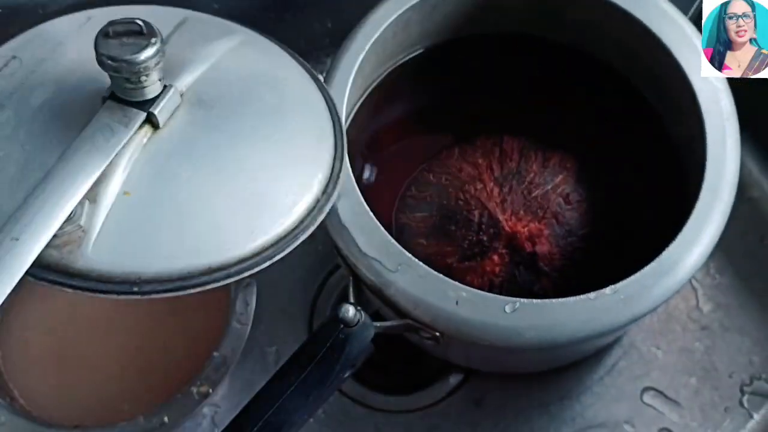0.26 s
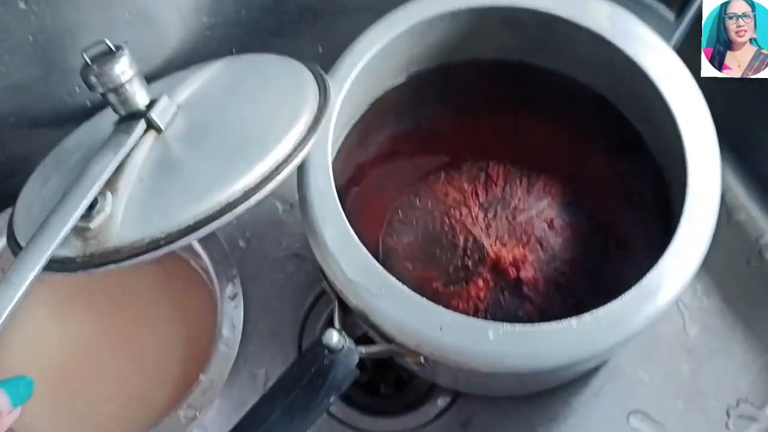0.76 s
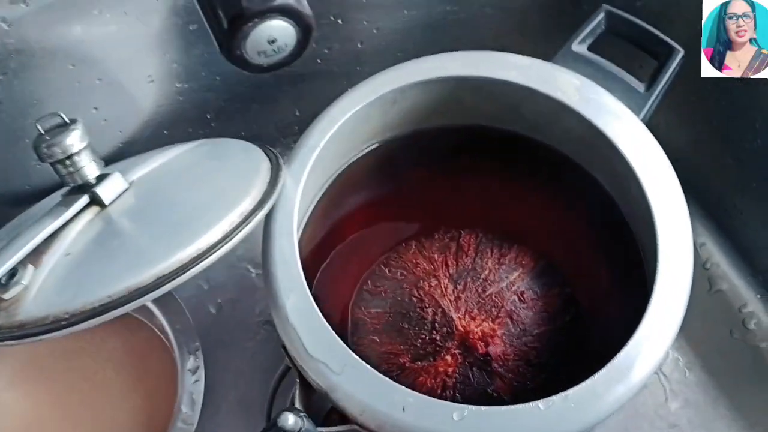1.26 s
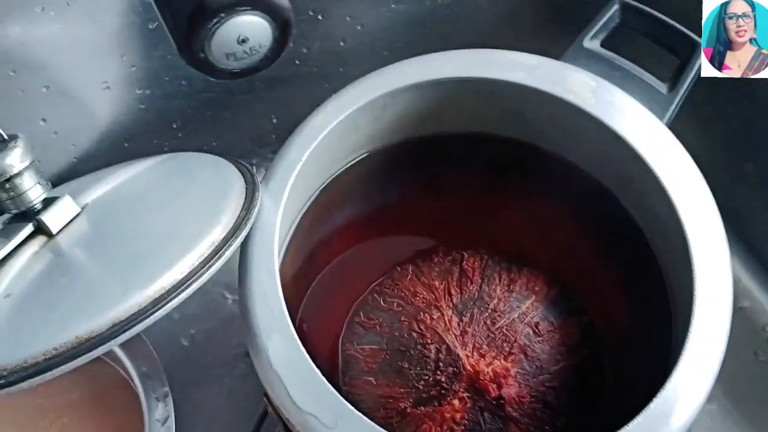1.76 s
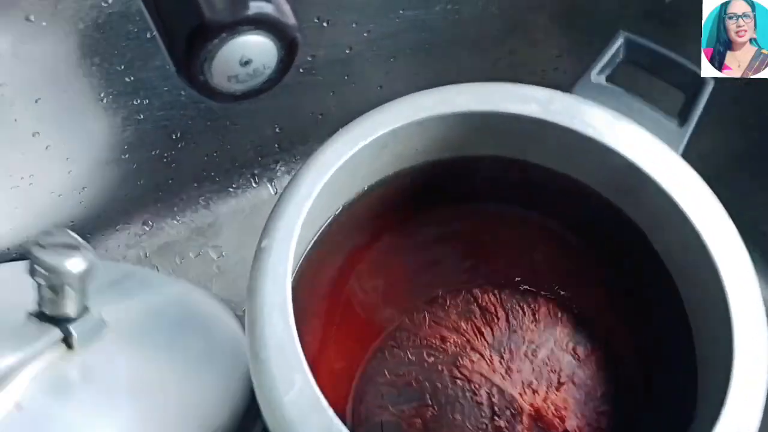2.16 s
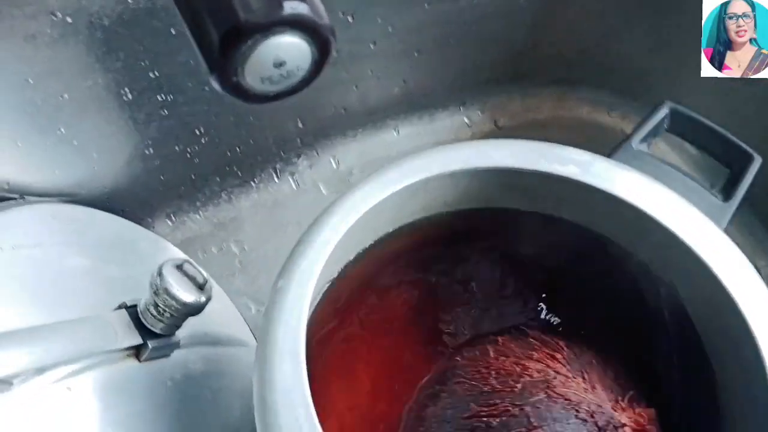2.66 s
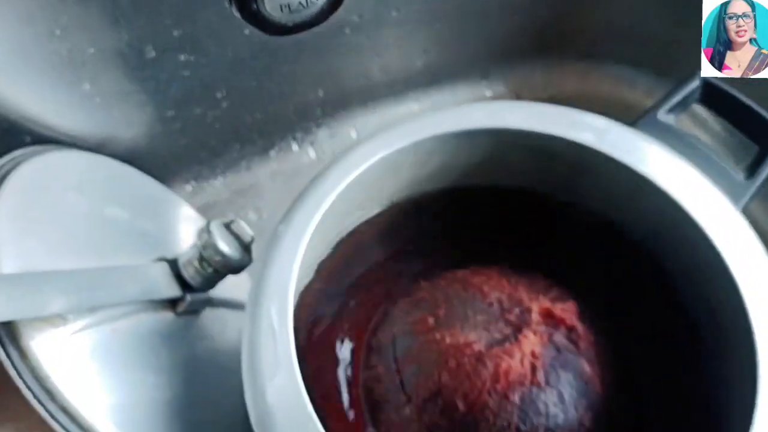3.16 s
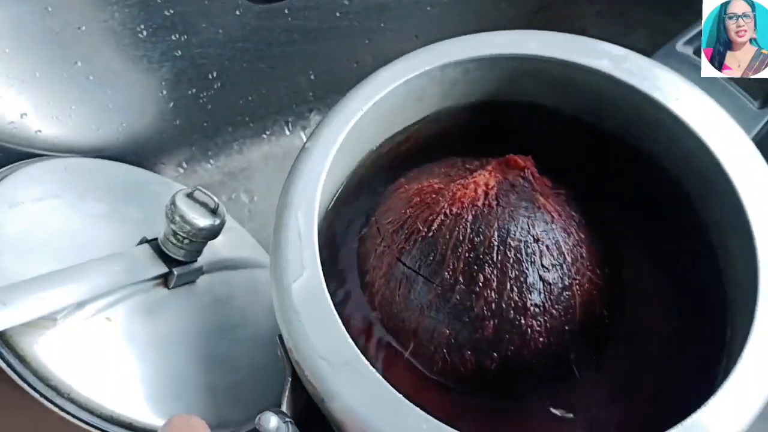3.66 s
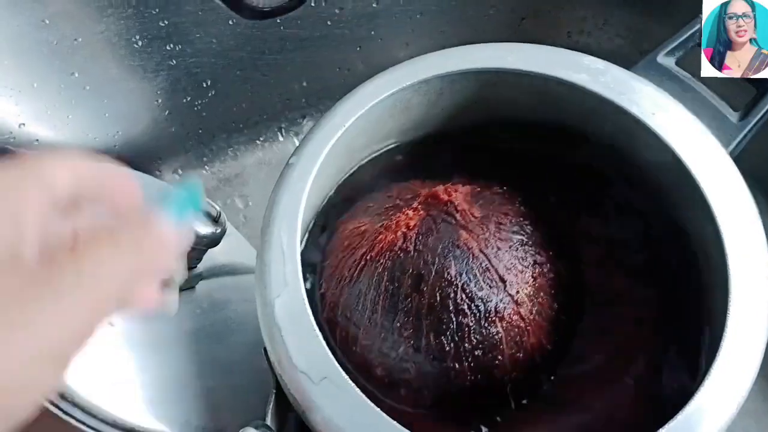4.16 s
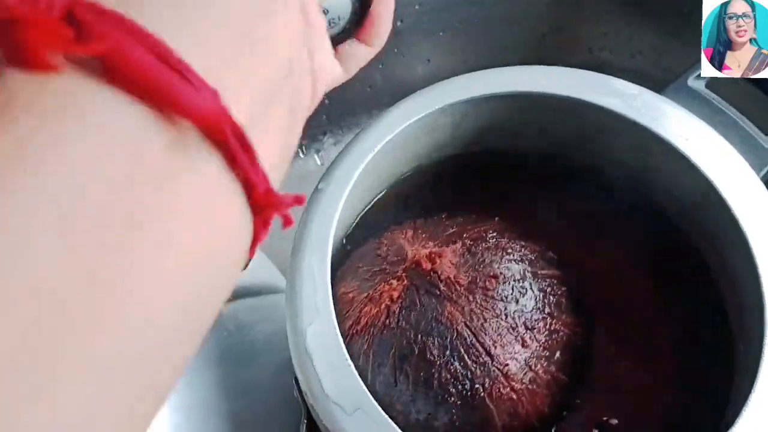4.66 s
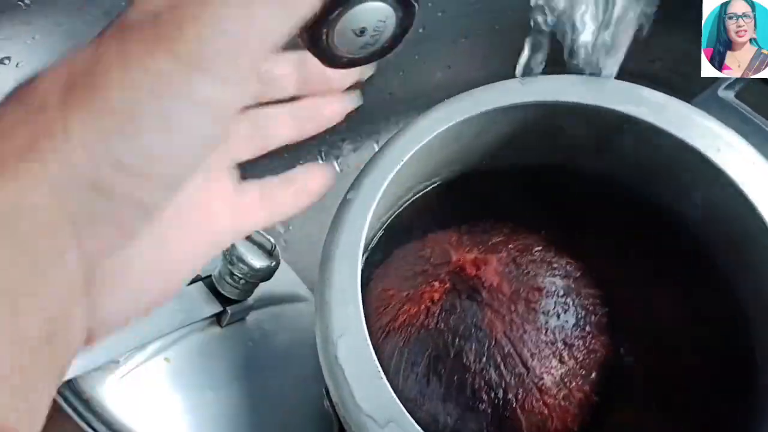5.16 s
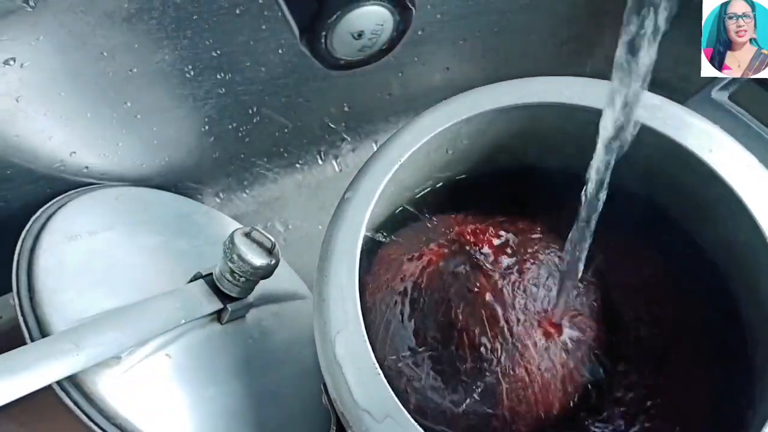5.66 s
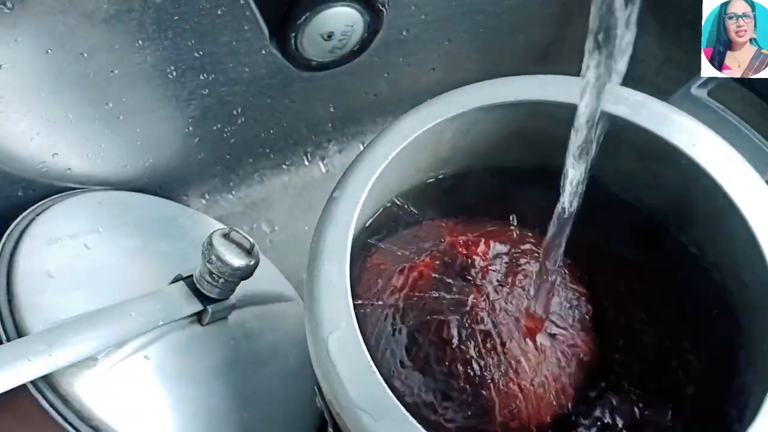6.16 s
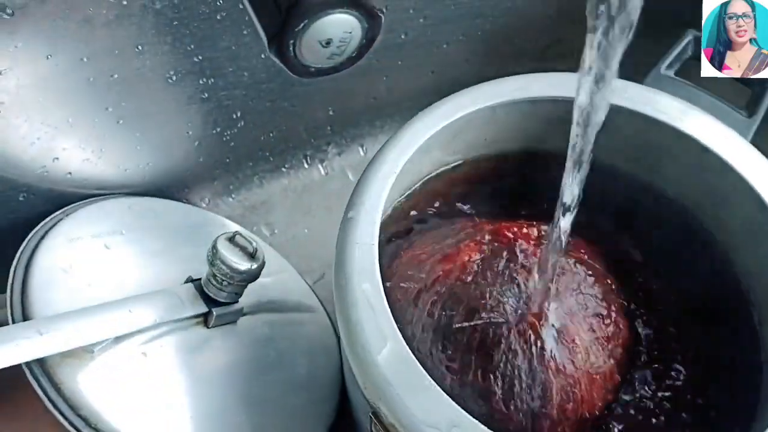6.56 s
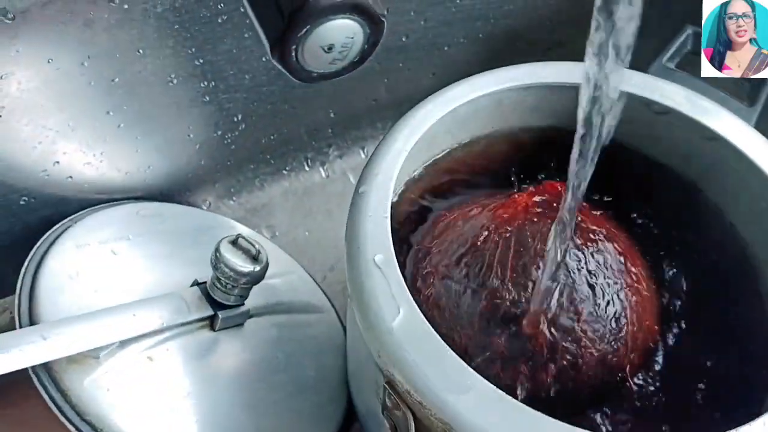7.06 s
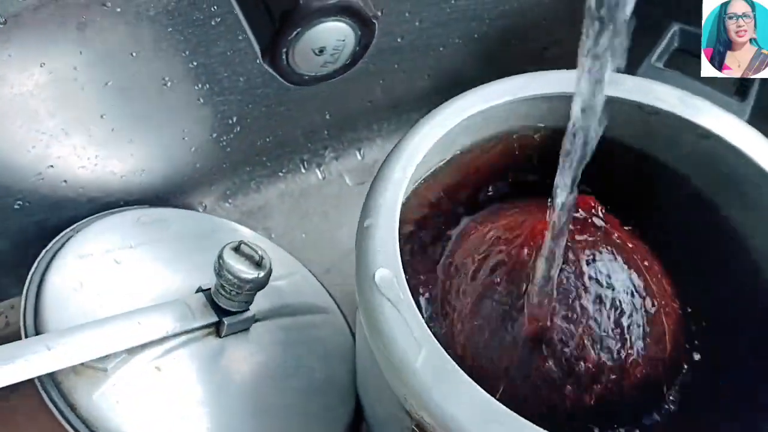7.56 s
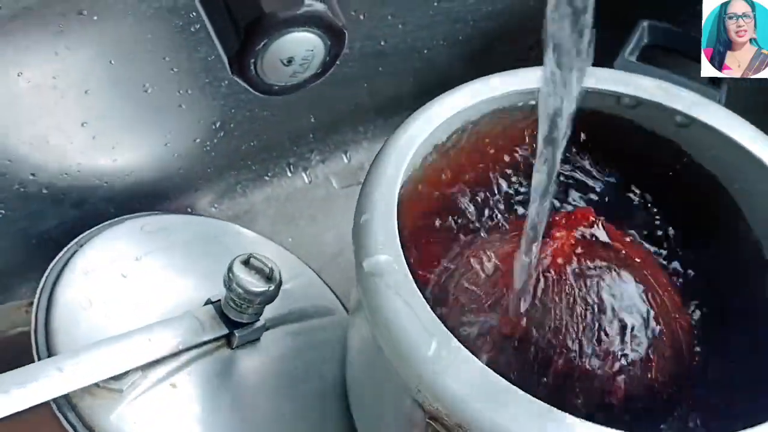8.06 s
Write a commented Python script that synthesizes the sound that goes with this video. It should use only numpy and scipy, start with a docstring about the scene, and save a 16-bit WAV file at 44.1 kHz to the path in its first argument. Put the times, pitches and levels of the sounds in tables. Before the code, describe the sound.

Metal lid and pot clank, scrape and thud in a steel sink, then a tap knob clicks and water splashes over a coconut.

```python
"""A lid and a pot knock and scrape as they are shifted and set down in a steel kitchen sink, over a faint rumble;
a tap knob clicks and grates, then water runs over a coconut into the pot, which rocks and bumps.
Impacts are noise crashes with decaying modes, scrapes are dense stick-slip grains, and water is
filtered droplet noise with damped bubbles. Two close microphone ports hear it with hiss suppression."""
import sys
import numpy as np
from scipy import signal
from scipy.fft import rfft, irfft, next_fast_len
from scipy.io import wavfile
from scipy.ndimage import uniform_filter1d

SR = 44100
rng = np.random.default_rng(int(sys.argv[2]) if len(sys.argv) > 2 else 0)


def wav_record(signal):
    """Record a signal, one row per channel, as 16-bit PCM in the file named by sys.argv[1]."""
    frames = np.transpose(np.atleast_2d(signal))
    bounded = np.clip(frames, -1, 1)
    # unit amplitude maps onto the largest positive 16-bit level
    quanta = np.round(bounded * 32767).astype(np.int16)
    wavfile.write(sys.argv[1], SR, quanta)


N = 366912


def amp(db):
    """Decibel law: the amplitude ratio of a level in dB."""
    return 10 ** (np.asarray(db) / 20)


def rms_one(x):
    """Normalisation by mean power: scaled to rms 1."""
    return x / np.sqrt(np.mean(x ** 2) + 1e-20)


def in_time(table):
    """Linear interpolation: a table's columns at every sample, -140 dB outside it."""
    s, *columns = np.transpose(table)
    t = np.arange(N) / SR
    return [np.interp(t, s, column, left=-140, right=-140) for column in columns]


def gate(start, end, fade):
    """Envelope: fades in, holds at 1, fades out."""
    t = np.arange(N) / SR
    return np.clip(np.minimum(t - start, end - t) / fade, 0, 1) ** 2


def convolve(x, h):
    """Convolution theorem: spectra multiply; the result is cut to N."""
    size = next_fast_len(N + len(h))
    return irfft(rfft(x, size) * rfft(h, size), size)[..., :N]


def band_pass(x, low_hz, high_hz):
    """Butterworth band-pass: flat between its two edges."""
    return signal.sosfilt(signal.butter(2, [low_hz, high_hz], "band", fs=SR, output="sos"), x)


def ring(clicks, hz, t60):
    """Damped resonator: a unit click sets a sine of height 1 ringing."""
    r, w = amp(-60 / (t60 * SR)), 2 * np.pi * hz / SR
    return signal.lfilter([0, np.sin(w)], [1, -2 * r * np.cos(w), r * r], clicks + 1e-18)


def drift(rate_hz):
    """Low-passed Gaussian noise: slow chance of spread 1, computed at every 40th sample."""
    r = np.exp(-80 * np.pi * rate_hz / SR)
    noise = rng.standard_normal(N // 40 + 2002)
    slow = signal.lfilter([1], [1, -2 * r, r * r], noise)[2000:]   # the filter's start is dropped
    return np.interp(np.arange(N) / 40, np.arange(len(slow)), rms_one(slow))


def grains(per_s, spread_db):
    """Shot noise: two draws of uneven clicks at random moments; rms 1."""
    sizes = amp(spread_db * np.minimum(rng.exponential(1, (2, N)), 5))
    sizes = sizes * rng.choice([-1, 1], (2, N))
    return rms_one(sizes * (rng.random((2, N)) < per_s / SR))


# left-right likeness of the sound at the two ports: pitch_hz, likeness (0 to 1)
PORT_LIKENESS = [(100, 0.99), (700, 0.92), (2500, 0.015), (15000, 0.036)]


def spread(pair, hz):
    """Spatial coherence: two unrelated draws mixed as alike as the ports hear this pitch."""
    at, alike = np.transpose(PORT_LIKENESS)
    alike = np.clip(np.interp(np.log(hz), np.log(at), alike), 0, 1)
    shared = np.sqrt((1 + alike) / 2) * pair[0]
    opposed = np.sqrt((1 - alike) / 2) * pair[1]
    return shared + opposed * [[1], [-1]]


# modes of basin, pot and lid: pitch_hz, width_hz, level_db above the dense modes
STEEL_MODES = [(91, 16, 12), (142, 14, 14), (172, 20, 6), (313, 16, 8), (392, 16, 7), (485, 40, 8),
               (581, 25, 6), (674, 18, 8), (875, 30, 6), (939, 18, 8), (1135, 20, 8), (1724, 40, 7),
               (2307, 40, 7), (2518, 25, 10), (2936, 25, 10), (3417, 35, 7), (4171, 30, 7), (4498, 30, 6),
               (5023, 40, 5)]


def colour(spectrum, low_hz, high_hz, modal):
    """Minimum-phase filter by folded cepstrum: one part of a spectrum with the steel's modes; energy 1."""
    hz, (at, db) = np.linspace(1, SR / 2, 4097), np.transpose(spectrum)
    db = np.interp(np.log(hz), np.log(at), db)
    peaks = sum(amp(2 * up) / (1 + (2 * (hz - f) / width) ** 2) for f, width, up in STEEL_MODES)
    power = amp(2 * db) * (1 + modal * peaks)
    power = power / (1 + (low_hz / hz) ** 8) / (1 + (hz / high_hz) ** 8)
    cepstrum = irfft(np.log(power) / 2)
    cepstrum[1:4096] *= 2
    cepstrum[4097:] = 0
    h = irfft(np.exp(rfft(cepstrum)))
    return h / np.sqrt(np.sum(h ** 2))


STEADY_ABOVE_HZ = 340   # flicker shrinks above this


def patchy(levels, edges, spectrum, modal, clicks, patchy_db, rate_hz):
    """Subband modulation: coloured clicks, five bands a part, flickering partly together, partly alone."""
    out, together = 0, drift(rate_hz)
    for k, level in enumerate(levels):
        h = colour(spectrum, edges[k], edges[k + 1], modal)
        cuts = np.geomspace(edges[k], edges[k + 1], 6)
        part = convolve(level * spread(np.roll(clicks, 777 * k, axis=1), cuts[2]), h)
        for j, (low, high) in enumerate(zip(cuts, cuts[1:])):
            calm = min(1, STEADY_ABOVE_HZ / low)   # the treble is steadier
            flicker = amp(calm * patchy_db * (drift(rate_hz) + 1.25 * together))
            # alternate signs keep neighbours from cancelling where they cross
            out = out + (-1) ** j * band_pass(part, low, high) * flicker
    return out


def strikes(s, levels, t60, ping_hz, rise_ms, *, ping_db, spectrum, modal, crack_db, crack_s,
            ping_cycles, ping_rise_per_s, chime_db, chime_longer):
    """Impact excitation: a crack, a crash dying by band, modes with chance partials, and one short ping."""
    out, noise, edges = np.zeros((2, N)), grains(9000, 2.5), [30, 300, 1500, 4000, 20000]
    at, t60, draws = (s * SR).astype(int), np.clip(t60, .02, 1), rng.random((len(s), 3, 30))
    rise_s, modes = np.clip(rise_ms, .1, 30) / 1000, np.transpose(STEEL_MODES)[0][3:]

    for part, longer in enumerate([0.44, 1.17, 0.53, 0.19]):   # decay time of each band, times t60
        env = np.zeros(N)
        for i, db, last, soft in zip(at, levels[part], t60, rise_s):
            t = np.arange(min(SR, N - i)) / SR
            crack = amp(crack_db - 60 * t / (crack_s * longer)) * (part > 0)   # none in the lows
            crash = amp(-60 * t / (last * longer)) * (1 - np.exp(-t / 0.0084))
            env[i:i + SR] += amp(db) * (crash + crack) * (1 - np.exp(-(t / soft) ** 2))
        low, high = edges[part:part + 2]
        pair = spread(np.roll(noise, 999 * part, axis=1), np.sqrt(low * high))
        out += convolve(env * pair, colour(spectrum, low, high, modal))

    t = np.arange(SR // 3) / SR
    blows = zip(at, np.transpose(levels), t60, ping_hz, rise_s, draws)
    for i, dbs, last, pitch, soft, (place, size, side) in blows:
        hz = 350 * 17 ** place   # chance partials; the first ones give way to the steel's modes
        hz[:len(modes)] = modes * (1 + 0.0079 * (place[:len(modes)] - .5))
        db = dbs[np.searchsorted(edges, hz) - 1] + chime_db - 9.1 * size
        db = db - 21.0 * np.log2(hz / 2000) * (hz > 4000)
        chime = np.sin(2 * np.pi * hz[:, None] * t) * amp(db)[:, None]
        chime = chime * amp(-60 * t / (last * chime_longer))
        loud = dbs[np.searchsorted(edges, pitch) - 1] + ping_db
        ping = np.sin(2 * np.pi * pitch * t * (1 + ping_rise_per_s * t))
        ping = ping * amp(loud - 60 * t * pitch / ping_cycles)
        # each partial radiates its own way
        sides = np.array([np.sin(side * np.pi / 2), np.cos(side * np.pi / 2)])
        onset = 1 - np.exp(-(t / soft) ** 2)
        out[:, i:i + len(t)] += ((sides @ chime + ping) * onset)[:, :N - i]
    return out


RUMBLE_DB = -75.5


def rumble():
    """Low-passed noise: a faint low rumble of the house."""
    low_pass = signal.butter(2, 120, fs=SR, output="sos")
    return amp(RUMBLE_DB) * rms_one(signal.sosfilt(low_pass, rng.standard_normal(N)))


# spectrum of struck and dragged metal: pitch_hz, density_db (per Hz)
METAL_SPECTRUM = [(18, -67), (30, -22.5), (65, -18.5), (141, -9), (345, -7.5), (461, -6.5), (937, -10.5),
                  (1250, -14.5), (2900, -19), (7270, -25.5), (9460, -38.5), (12000, -33.5), (14800, -36),
                  (16000, -48.5)]
# metal on metal, lid, pot and basin: start_s, sizzle_db, clash_db, clang_db, boom_db (bands from treble
# to bass), t60_s (before each band's factor), ping_hz, rise_ms
KNOCKS = [(0.127, -56, -60, -78, -91, 0.25, 2500, 1.9), (0.323, -27, -35.5, -61, -54, 0.19, 2550, 0.75),
          (0.434, -16, -14.5, -19.5, -15, 0.75, 570, 0.23), (0.4784, -24.5, -54, -29.5, -46, 0.6, 860, 4.4),
          (0.682, -9.5, -12, -20.5, -33, 0.94, 2540, 0.57), (0.7475, -5, -19, -14.5, -21, 0.2, 927, 1),
          (1.1655, -8, -16.5, -26.5, -32, 0.25, 2580, 0.17),
          (1.1941, -19.5, -29.5, -36, -45, 0.86, 4040, 4.7), (1.7625, -24, -60, -62, -58, 0.03, 861, 1.5),
          (1.7775, -36, -52, -62, -60, 0.03, 2900, .8), (2.0608, -22, -29.5, -40.5, -35.5, 0.27, 2940, 2.8),
          (2.2698, -6, -13.5, -20.5, -15, 1, 4120, 1.8), (2.3385, -5, -14.5, -45, -47, 0.78, 2910, 1.8),
          (2.377, -10.5, -26, -35, -36, 1, 2920, 19), (2.4421, -8, -15, -32, -14.5, 0.62, 2703, 1.1),
          (2.6271, -8.5, -17.5, -29, -18.5, 0.26, 3440, 1.3),
          (2.6788, 0.5, -11.5, -18.5, -8, 0.065, 917, 5.4), (3.046, -19, -31, -29, -27, 0.37, 606, 1.5),
          (3.0814, -10, -15, -14.5, -2, 0.25, 472.4, 0.74), (3.112, -9, -16, -41, -17, 0.28, 613, 1.4),
          (3.2046, -2.5, -8, -22.5, -21, 0.14, 394, 3.5), (3.527, -12, -22, -29, -12.5, 0.27, 523, 1.5),
          (3.681, -19.5, -23, -27.5, -20.5, 0.2, 456, 1), (3.899, -37, -53, -39.5, -19.5, 0.17, 409, 1.3),
          (4.0985, -32, -48.5, -51.5, -50, 0.35, 457, 14.8), (4.5412, -46, -66, -70, -45.5, 0.35, 399, 5.8),
          (5.3226, -48, -55.5, -54.5, -46.5, 0.24, 633, 3.9),
          (6.3135, -28.5, -36, -40, -23.5, 0.36, 395, 0.9),
          (7.0845, -20.5, -31, -33.5, -33.5, 0.24, 514, 1.54),
          (7.95, -14.5, -31, -31, -21.5, 0.29, 480, 0.95),
          (8.1588, -14, -13.5, -25.5, -17, 0.12, 480, 0.93),
          (8.2894, -18, -20, -22.5, -24, 0.14, 515, 0.37)]


def knocks():
    """Impact of solids: lid, pot and basin strike one another and ring in their modes."""
    s, sizzle, clash, clang, boom, t60, ping_hz, rise_ms = np.transpose(KNOCKS)
    return strikes(s, [boom, clang, clash, sizzle], t60, ping_hz, rise_ms, ping_db=3.5,
                   spectrum=METAL_SPECTRUM, modal=0.18, crack_db=0.7, crack_s=0.025,
                   ping_cycles=100.0, ping_rise_per_s=0, chime_db=-5.0, chime_longer=0.36)


THUMP_DB, T60_TIMES_WIDTH = -8.5, 2.8   # relative to the boom; decay time (s) times mode width (Hz)


def thumps():
    """Modal excitation: each knock rings the basin's three lowest modes, with new strengths every time."""
    s, boom = np.transpose(KNOCKS)[[0, 4]]
    out, chance_db = 0, rng.normal(0, 1.0, (len(s), 3))
    for k, (hz, width, up) in enumerate(STEEL_MODES[:3]):
        push = np.zeros(N)
        relative_db = up - STEEL_MODES[1][2]
        push[(s * SR).astype(int)] = amp(boom + THUMP_DB + relative_db + chance_db[:, k])
        out = out + ring(push, hz, T60_TIMES_WIDTH / width)
    return band_pass(out, 70, 500)


DRAG_CLANG_DB, DRAG_CLANG_SHARE = -0.5, 0.39   # the pan's clang lies between scrape and boom
# lid and pot dragged over the steel: start_s, scrape_db, boom_db
DRAG = [(.33, -38.5, -54.5), (.42, -55.5, -43), (.57, -29.5, -29), (.85, -48, -34.5), (1.04, -45, -50.5),
        (1.16, -36.5, -40), (1.35, -42.5, -41.5), (1.58, -74.5, -58.5), (2.03, -58.5, -75),
        (2.08, -45.5, -53.5), (2.18, -27, -31), (2.26, -24, -30.5), (2.7, -41.5, -35), (2.85, -41, -41),
        (2.93, -59.5, -37), (3.03, -35, -39), (3.25, -46.5, -22), (3.35, -33, -29.5), (3.5, -28.5, -35),
        (3.85, -49, -44), (4.05, -58, -54), (4.3, -70, -77.5), (4.69, -65.5, -75.5)]


def drag():
    """Stick-slip friction: dense contacts sound through the steel."""
    contacts = grains(6000, 2.5)
    scrape, boom = in_time(DRAG)
    clang = DRAG_CLANG_DB + DRAG_CLANG_SHARE * scrape + (1 - DRAG_CLANG_SHARE) * boom
    return patchy(amp([boom, clang, scrape]), [30, 300, 1500, 18000], METAL_SPECTRUM, 0.18,
                  contacts, patchy_db=3.8, rate_hz=1.65)


# narrow bands of noise that swell and fade, as squeaks, ringing tones and soft low booms:
# start_s, end_s, pitch_hz, level_db (before the swell), t60_s (of each of two resonators)
NARROW_BANDS = [(0.346, 0.406, 2540, -35, 0.0058), (0.736, 1.15, 2400, -37, 0.009),
                (0.884, 1.5, 1690, -40, 0.02), (3.117, 3.872, 480, -36, 0.05), (3.13, 3.56, 141, -27, .12),
                (7.073, 7.143, 87, -38, 0.11), (2.35, 2.401, 2925, -14, 0.08),
                (4.9, 5.02, 2060, -37, 0.006), (4.905, 4.99, 3450, -42, 0.003), (3.98, 4.5, 64, -52, .05),
                (4.11, 4.21, 6900, -53, .0015), (4.846, 5.048, 142, -53, 0.037),
                (5.09, 5.256, 1277, -55, 0.015), (5.1, 5.29, 3700, -47, .002), (5.33, 5.5, 142, -46, .04),
                (2.14, 2.297, 1240, -25.5, 0.0038), (2.16, 2.26, 750, -28, .006),
                (1.04, 1.16, 5100, -50, .02), (5.67, 5.686, 1187, -28, 0.014),
                (5.7, 5.933, 610, -53.5, 0.037), (5.883, 5.996, 135, -53.5, 0.039),
                (6.27, 6.38, 1670, -46, .015), (6.354, 6.55, 508, -39, 0.012),
                (6.97, 7.124, 497, -42, 0.045), (7.58, 7.72, 2500, -42, .008), (7.91, 8.2, 142, -44, 0.016),
                (8.215, 8.3, 140, -35, .05)]


def narrow_bands():
    """Resonant filtering: noise twice through one narrow resonator, swelling in and dying away."""
    out, t = 0, np.arange(N) / SR
    for start, end, hz, db, t60 in NARROW_BANDS:
        swell_at, swell_db = [start - .02, start, end, end + 0.025], [-43.0, 1.0, -10.0, -62.5]
        swell = np.interp(t, swell_at, swell_db, -140, -140)
        rough = ring(ring(rng.standard_normal(N), hz, t60), hz, t60)
        out = out + amp(db + swell) * rms_one(rough)
    return out


HUM_FROM_S, HUM_TO_S, HUM_FADE_S = 0.92, 2.4, 0.044
HUM_HZ, HUM_RMS_DB, HUM_LOSS_DB_PER_S = 223.1, -38.5, 15


def lid_hum():
    """Exponential decay of one mode: the lid's lowest rings on until it is touched."""
    t = np.arange(N) / SR
    level = amp(HUM_RMS_DB - HUM_LOSS_DB_PER_S * (t - HUM_FROM_S))
    tone = np.sqrt(2) * np.sin(2 * np.pi * HUM_HZ * t)
    return level * gate(HUM_FROM_S, HUM_TO_S, HUM_FADE_S) * tone


WHINE_FROM_S, WHINE_TO_S, WHINE_FADE_S = 1.58, 2.1, .06
WHINE_HZ, WHINE_SAG_HZ_PER_S = 896, 140   # pitch at the start, before its small drift
WHINE_DB, WHINE_OCTAVE_DB = -66, -54.5   # rms levels before the waver


def whine():
    """Phase integration of a falling pitch: a faint far whine with its octave, wavering in level."""
    t = np.arange(N) / SR
    hz = WHINE_HZ - WHINE_SAG_HZ_PER_S * (t - WHINE_FROM_S)
    phase = 2 * np.pi * np.cumsum(hz * (1 + .012 * drift(25))) / SR
    waver = amp(2.5 * drift(12.0))
    tone = amp(WHINE_DB) * np.sin(phase) + amp(WHINE_OCTAVE_DB) * np.sin(2 * phase)
    return np.sqrt(2) * waver * gate(WHINE_FROM_S, WHINE_TO_S, WHINE_FADE_S) * tone


# spectrum of the water, used for the light blows too: pitch_hz, density_db (per Hz)
WATER_SPECTRUM = [(30, -21.5), (161, -13), (426, -19.5), (569, -17), (962, -11.5), (1350, -22.5),
                  (2480, -17.5), (6720, -14.5), (9220, -21.5), (12000, -19), (16000, -16.5)]


def taps(table, t60, ping_db, ping_rise_per_s, rise_ms):
    """Weak impact: light blows move no basin and set no partials ringing."""
    s, sizzle, clash, clang, ping_hz = np.transpose(table)
    silent = np.full(len(s), -140)
    return strikes(s, [silent, clang, clash, sizzle], np.full(len(s), t60), ping_hz,
                   np.full(len(s), rise_ms), ping_db=ping_db, spectrum=WATER_SPECTRUM, modal=0.3,
                   crack_db=8, crack_s=0.03, ping_cycles=62.0, ping_rise_per_s=ping_rise_per_s,
                   chime_db=-np.inf, chime_longer=1)


# the tap knob clicks: start_s, sizzle_db, clash_db, clang_db, ping_hz
CLICKS = [(4.7013, -28.5, -51.5, -68, 5260), (4.7703, -14.5, -26, -55, 2660),
          (5.0771, -23, -27.5, -52, 2560)]


def knob_clicks():
    """Brief impact: the knob's clicks, each with a steady ping."""
    return taps(CLICKS, t60=0.27, ping_db=5.5, ping_rise_per_s=0, rise_ms=1.0)


TICKS_PER_S, TICK_DB, TICK_T60_S = 45, -1, .025


def ticks():
    """Poisson bursts: a gain that stray drops lift suddenly at random, each lift dying at once."""
    bursts = rng.exponential(1, N) * (rng.random(N) < TICKS_PER_S / SR)
    decay = amp(-60 / (TICK_T60_S * SR))
    return 1 + amp(TICK_DB) * signal.lfilter([1], [1, -decay], bursts + 1e-18)


MIST_DB, MIST_SHARE = -11.5, 0.76   # the finest mist follows the spray
POOL_BOOM_DB, POOL_BOOM_SHARE = -31, 0.57   # the boom follows the gurgle
BUBBLES_PER_S, BUBBLE_SPREAD_DB = 500, 3.5
BUBBLE_CYCLES_AT_1KHZ = 22.0   # cycles to -60 dB in each of two resonators
# the knob grates and hisses as it is turned: start_s, treble_db, middle_db
KNOB = [(4.8, -59, -54), (4.855, -48, -54.5), (4.9, -37, -47), (4.94, -52, -61), (4.968, -37.5, -54),
        (5.02, -52.5, -52.5), (5.07, -51, -52), (5.27, -82, -69.5)]
# the stream runs: start_s, spray_db, splatter_db, gurgle_db (where it plunges into the pool)
FLOW = [(5.33, -50.5, -61.5, -62), (5.49, -45.5, -63.5, -73), (5.8, -44, -52, -62.5),
        (6.12, -43, -53.5, -69), (6.31, -44.5, -48.5, -53), (6.46, -43, -46.5, -57),
        (6.58, -42, -47, -49.5), (6.75, -47.5, -56.5, -69), (6.87, -50.5, -67, -74),
        (6.97, -48, -52, -62.5), (7.2, -45, -62, -72), (7.44, -49.5, -75, -75), (7.57, -45, -47, -57),
        (7.75, -46, -47, -52.5), (7.87, -43, -51, -59.5), (8.01, -45, -41, -39.5),
        (8.13, -38.5, -40, -39.5), (8.32, -44, -46, -47.5)]


def water():
    """Droplet noise and bubble resonance: spray, splatter and gurgle; the knob's grating shares their bands."""
    spray, splatter, gurgle = amp(in_time(FLOW))
    spray, splatter = spray * ticks(), splatter * ticks()
    boom = amp(POOL_BOOM_DB) * gurgle ** POOL_BOOM_SHARE
    knob_treble, knob_middle = amp(in_time(KNOB))
    spray, splatter = spray + knob_treble, splatter + knob_middle
    mist = amp(MIST_DB) * spray ** MIST_SHARE
    droplets = grains(9000, 2.5)
    out = patchy([boom, gurgle, splatter, spray, mist], [30, 300, 1200, 3200, 8500, 18000],
                 WATER_SPECTRUM, 0.15, droplets, patchy_db=3.7, rate_hz=3.0)

    pops, dealt = grains(BUBBLES_PER_S, BUBBLE_SPREAD_DB), rng.integers(0, 24, N)
    for k, hz in enumerate(np.geomspace(350, 5000, 24)):   # each pop is dealt to one pitch
        level = gurgle if hz < 1200 else splatter if hz < 3200 else spray
        t60 = BUBBLE_CYCLES_AT_1KHZ / np.sqrt(hz * 1000)
        rings = ring(ring(pops * (dealt == k), hz, t60), hz * 0.88, t60)   # rung twice: a soft start
        out += level * spread(rms_one(rings), hz) / 4
    return out


# slaps of water on coconut, pool and rim: start_s, sizzle_db, clash_db, clang_db, ping_hz (at onset)
SLAPS = [(5.3228, -29.5, -63.5, -59, 640), (5.4292, -26, -63, -57, 5470), (5.5838, -24.5, -35, -69, 3000),
         (5.667, -22.5, -36.5, -49.5, 1040), (5.693, -14.5, -35.5, -44.5, 4670),
         (5.7464, -40, -34.5, -73, 3060), (5.7936, -29, -37, -75, 3280), (5.989, -25, -39, -80, 3120),
         (6.0452, -38, -35.5, -53.5, 1387), (6.3743, -27, -36.5, -55, 478),
         (6.6633, -25, -29.5, -39.5, 2990), (6.9381, -34.5, -35.5, -49.5, 2570),
         (7.0392, -27.5, -34, -44, 488), (7.145, -31, -39.5, -65, 1830), (7.2505, -22.5, -37.5, -56, 2270),
         (7.4328, -25.5, -66, -61, 6130), (7.5433, -29, -40.5, -56.5, 4700),
         (7.5744, -42, -47.5, -36.5, 738), (7.6519, -25, -35, -39, 842), (7.7264, -30.5, -32.5, -33, 478)]


def slaps():
    """Liquid impact: water slaps, each with a ping of rising pitch."""
    return taps(SLAPS, t60=0.24, ping_db=6, ping_rise_per_s=0.081, rise_ms=.5)


BLIP_SWELL_S, BLIP_RISE_PER_S = .003, 2.5
# single bubble blips, loud and faint: start_s, pitch_hz (at onset), level_db (before the side's gain)
BLIPS = [(5.555, 3260, -45), (5.695, 1470, -38), (5.925, 3190, -40), (6.07, 3200, -44), (6.11, 3280, -41.5),
         (6.195, 3940, -40), (6.225, 3910, -41.5), (6.375, 3480, -35), (6.615, 2375, -39.5),
         (7.015, 2300, -36), (7.085, 2520, -32.5), (7.09, 1850, -36), (7.145, 1900, -44),
         (7.255, 1173, -40), (7.61, 920, -51), (7.675, 820, -32), (7.87, 1460, -35), (8.014, 960, -24),
         (7.725, 2400, -28), (7.76, 470, -35), (8.16, 2493, -20), (8.165, 3600, -34), (8.295, 2520, -36)]


def blips():
    """Bubble resonance: single bubbles swell, rise in pitch and die, each from its own side."""
    out, t = np.zeros((2, N)), np.arange(SR // 10) / SR
    swell = t / BLIP_SWELL_S * np.exp(1 - t / BLIP_SWELL_S)
    for (s, hz, db), side_db in zip(BLIPS, rng.normal(0, 6.5, len(BLIPS))):
        i = int(s * SR)
        tone = swell * np.sin(2 * np.pi * hz * t * (1 + BLIP_RISE_PER_S * t))
        out[:, i:i + len(t)] += (amp([[db + side_db], [db - side_db]]) * tone)[:, :N - i]
    return out


ROOM_T60_S, ROOM_DB, ROOM_LOW_HZ = 0.29, -4.5, 565


def room(x):
    """Diffuse reverberation of basin and kitchen: decaying noise, high-passed, drawn for each port."""
    t = np.arange(SR // 2) / SR
    tails = rng.standard_normal((2, len(t))) * amp(-60 * t / ROOM_T60_S)
    tails = signal.sosfilt(signal.butter(2, ROOM_LOW_HZ, "high", fs=SR, output="sos"), tails)
    tails = [tail / np.sqrt(np.sum(tail ** 2)) for tail in tails]
    return amp(ROOM_DB) * np.array([convolve(x[c], tails[c]) for c in (0, 1)])


PORT_LAG_S = .0003


def scene():
    """Superposition: all sources add, reach the left port a little late, and gain the room."""
    direct = knocks() + knob_clicks() + slaps()
    direct += drag()
    direct += water()
    direct += lid_hum() + whine() + narrow_bands() + rumble()
    direct += blips() + thumps()
    direct[0] = np.interp(np.arange(N) - round(PORT_LAG_S * SR), np.arange(N), direct[0])
    return amp([[.3], [-.3]]) * (direct + room(direct))


HISS_SHARE, SUPPRESS_DB = .8, -12   # share of the usual power removed; lowest gain


def suppress(x):
    """Spectral subtraction: bins that do not stand out of their slow local mean are turned down."""
    frames = signal.stft(x, nperseg=1024, noverlap=768)[2]
    power = np.mean(np.abs(frames) ** 2, axis=0) + 1e-14
    now = signal.lfilter([.15], [1, -.85], power)
    usual = uniform_filter1d(np.log(now), size=60, axis=1)   # along time
    usual = np.exp(uniform_filter1d(usual, size=15, axis=0))   # along pitch
    gain = np.sqrt(np.maximum(1 - HISS_SHARE * usual / now, amp(2 * SUPPRESS_DB)))
    return signal.istft(frames * gain, nperseg=1024, noverlap=768)[1][:, :N]


MIC_LOW_HZ, CUTOFF_HZ = 49.25, 16400


def record(dry):
    """Transducer limits: capsules lose deep bass, hiss is suppressed, overload clips, the top is cut."""
    x = signal.sosfilt(signal.butter(2, MIC_LOW_HZ, "high", fs=SR, output="sos"), dry)
    x = np.clip(suppress(x), -1, 1)
    return signal.sosfilt(signal.cheby2(12, 70, CUTOFF_HZ, fs=SR, output="sos"), x)


dry = scene()
out = record(dry)
wav_record(out)
```